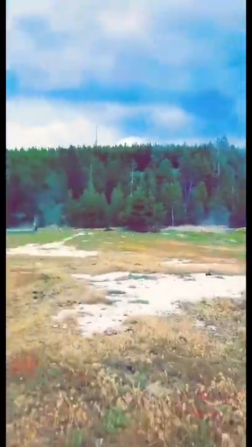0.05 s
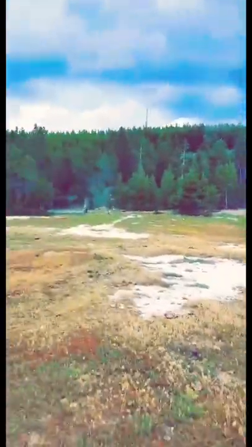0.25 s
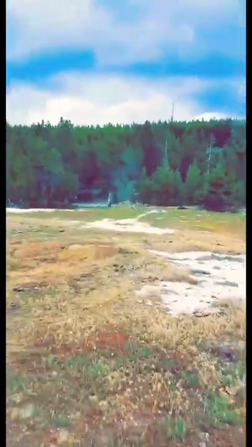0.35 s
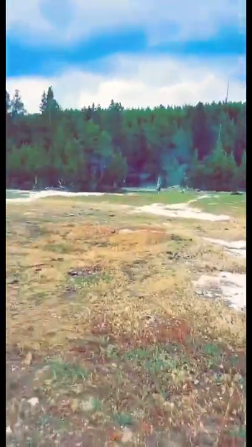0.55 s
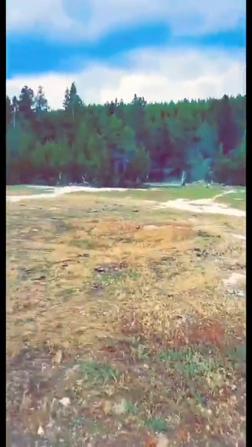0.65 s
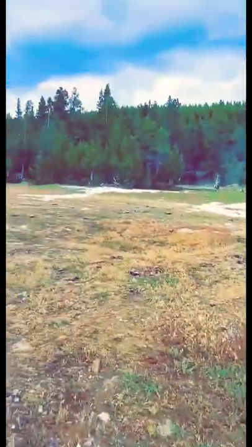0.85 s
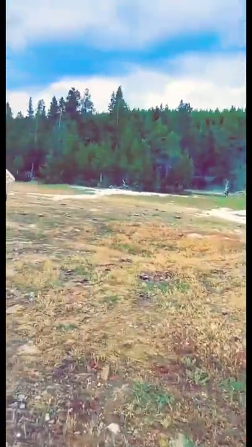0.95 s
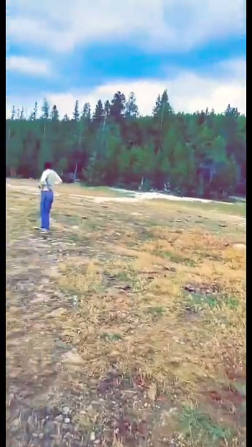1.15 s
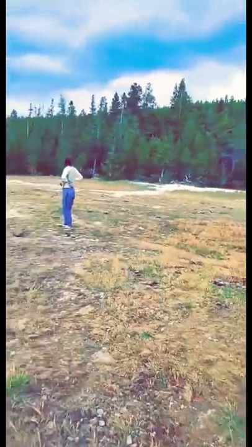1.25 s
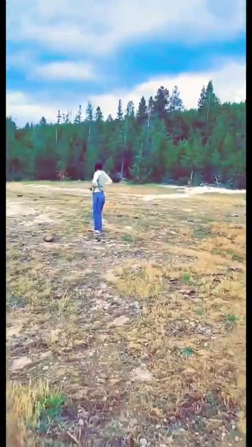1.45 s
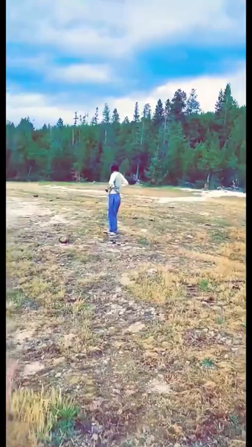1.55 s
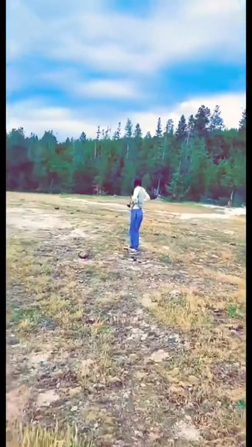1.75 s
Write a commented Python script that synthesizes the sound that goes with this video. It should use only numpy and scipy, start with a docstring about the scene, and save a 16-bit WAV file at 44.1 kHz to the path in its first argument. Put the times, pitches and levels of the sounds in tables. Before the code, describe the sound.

Wind buffets the microphone with a low, uneven rumble over a faint distant rush in an open meadow. Near 0.2 seconds, jacket fabric gives a soft, high swish with a dull rustle. A gust follows at 0.5, then a second swish from 0.6 to 1, with a brief scuff at 0.7. The wind peaks near 1.2. A third swish runs from 1.3 to 1.6, ending in a tiny tick.

```python
"""An open meadow: from the start, turbulent wind buffets the microphone over a faint far rush.
Near 0.2 s a high friction hiss swells and fades, most likely jacket fabric sliding close by,
with a duller rustle of folds. A gust follows, then a second sweep (0.6-1 s) with one short scuff
that knocks the hand-held camera. The wind peaks near 1.2 s, before a third sweep (1.3-1.6 s).
The fabric catches in a few tiny ticks along the way, the last and sharpest just after that sweep."""
import sys
import numpy as np
from scipy import signal
from scipy.fft import rfft, irfft, next_fast_len
from scipy.io import wavfile
from scipy.ndimage import map_coordinates

SR = 44100
rng = np.random.default_rng(int(sys.argv[2]) if len(sys.argv) > 2 else 0)


def materialize(psi):
    """Save the field psi as 16-bit PCM at rate SR to the path in sys.argv[1].

    A 1-D psi becomes a single channel; in a 2-D psi each row is a channel.
    """
    bounded = np.clip(np.atleast_2d(psi).T, -1, 1)
    quanta = np.round(bounded * 32767).astype(np.int16)
    wavfile.write(sys.argv[1], SR, quanta)


N = 79380  # 1.8 s


def swish():
    """Sliding friction: fabric gives a narrow sheen when slow and a broader hiss when brisk."""
    # strength of the sliding: t/s, level/dB
    slide = [(0, -74.5), (.08, -70.5), (.11, -65), (.18, -61), (.24, -54), (.28, -64), (.35, -72),
             (.48, -77.5), (.585, -73), (.615, -62), (.67, -56.5), (.70, -55.5), (.77, -53.5), (.825, -63),
             (.857, -52), (.905, -54), (.945, -51), (.975, -60), (1.02, -66), (1.09, -70.5), (1.13, -65),
             (1.2, -65), (1.25, -67.5), (1.285, -66.5), (1.315, -59.5), (1.44, -59), (1.51, -54.5),
             (1.555, -56), (1.59, -62.5), (1.63, -70.5), (1.8, -72)]
    # spectra of the broad hiss and the narrow sheen: f/Hz, relative level/dB
    broad_spectrum = [(1000, -54), (3000, -28.5), (4000, -23.5), (4900, -30.5), (6200, -21.5),
                      (7600, -29.5), (8600, -17), (10200, -13.5), (11300, -5.5), (12300, -0.5),
                      (13200, -1.5), (14100, -7.5), (15500, -3)]
    sheen_spectrum = [(5000, -33), (9500, -29), (11200, -8.5), (12500, 1), (13300, -8), (14100, -16),
                      (15300, 0)]
    brisk_db = -55
    broad_growth, sheen_growth = 1.184, 0.81  # dB per dB of sliding
    effort_db = curve(slide) - brisk_db + 0.34 * wobble(70)
    broad = amp(2 + broad_growth * effort_db) * friction(broad_spectrum, grain_db=2.5)
    sheen = amp(-5.5 + sheen_growth * effort_db) * friction(sheen_spectrum, grain_db=5.0)
    return amp(brisk_db) * (broad + sheen)


def rustle():
    """Friction and buckling: folds rub dully, some rasp in a narrow band, and a few creases flip."""
    # rubbing of the folds: t/s, relative level/dB
    rubbing = [(0, -96), (.1, -81.5), (.14, -75), (.18, -75.5), (.225, -76), (.3, -81.5), (.45, -104),
               (.6, -88.5), (.68, -77), (.74, -72), (.81, -78), (.845, -76), (.88, -79.5), (.94, -69.5),
               (.995, -72.5), (1.05, -72.5), (1.15, -82.5), (1.28, -84.5), (1.42, -81), (1.55, -75.5),
               (1.6, -88.5), (1.8, -80)]
    # spectrum of the folds: f/Hz, relative level/dB
    spectrum = [(100, -15), (300, 1.5), (550, -5.5), (1000, -8.5), (1550, 2), (1850, -2.5), (2250, -0.5),
                (3000, -20), (4000, -15.5), (4900, -23), (6500, -11), (9000, -25)]
    # creases flipping: t/s, level/dB
    creases = [(.218, -62), (.901, -66), (1.038, -61), (1.5578, -59)]
    # folds rasping: t/s, level/dB, half-length/s, centre f/Hz
    rasping = [(0.23, -71.5, 0.022, 1280), (0.951, -67.5, 0.019, 2100), (1.03, -74, 0.019, 1650),
               (1.103, -76, 0.016, 2330)]
    rub = amp(curve(rubbing) + 1 + 2.2 * wobble(90)) * friction(spectrum, grain_db=2.5)
    flips = sum(amp(db) * burst(t, t60=0.019) for t, db in creases)
    rasps = sum(amp(db) * swell(t, half) * band_noise(hz) for t, db, half, hz in rasping)
    return rub + flips * noise(spectrum) + rasps


def scuff():
    """Stick-slip and impact: a fold drags past and knocks the camera body into a damped vibration."""
    # the passing fold: t/s, relative level/dB, half-length/s
    drags = [(0.708, -44, 0.0024)]
    # spectrum of its slips: f/Hz, relative level/dB
    spectrum = [(100, -14), (220, -14), (330, 10.5), (600, -8), (950, -8), (1500, 2.5), (2300, -1.5),
                (3100, -14.5), (3900, -10.5), (4800, -13.5), (6200, -4), (8000, -11.5), (10300, -7.5),
                (12200, 8), (14000, -12.5), (15500, 2)]
    body_hz = 325
    slips = sum(amp(db) * swell(t, half) for t, db, half in drags)
    knock = sum(amp(db - 12) * burst(t - half, t60=0.033) for t, db, half in drags)
    return slips * friction(spectrum, grain_db=3) + knock * np.sin(2 * np.pi * body_hz * clock())


def ticks():
    """Impulsive excitation: each tiny catch of the fabric releases a bright, decaying noise."""
    # catches: t/s, level/dB, T60/s
    catches = [(0.372, -66.5, 0.079), (0.533, -66, 0.023), (1.217, -58.5, 0.052), (1.2653, -55.5, 0.034),
               (1.644, -48, 0.0037)]
    # spectrum of a catch: f/Hz, relative level/dB
    spectrum = [(1000, -28), (5000, -20), (9000, -15.5), (12500, 11.5), (15500, -1.5)]
    return sum(amp(db) * burst(t, t60) for t, db, t60 in catches) * noise(spectrum)


def wind():
    """Turbulent pressure: eddies of fairly even size thump the microphone as hard as the gust blows."""
    # gust strength: t/s, relative level/dB
    gusts = [(0, -69), (.08, -72), (.135, -62), (.23, -56.5), (.28, -67.5), (.31, -54.5), (.35, -62.5),
             (.378, -50), (.4, -60.5), (.475, -52), (.497, -42.5), (.53, -41), (.615, -53), (.637, -43.5),
             (.665, -59), (.71, -53), (.85, -56.5), (.94, -47.5), (.99, -51), (1.01, -42.5), (1.1, -45),
             (1.19, -38.5), (1.24, -46), (1.365, -65), (1.395, -48.5), (1.435, -51.5), (1.48, -58),
             (1.6, -59), (1.635, -57.5), (1.8, -58)]
    # spectrum of the buffeting: f/Hz, relative level/dB
    spectrum = [(15, -22.5), (30, -7), (50, 4.5), (68, 0.5), (90, -7), (130, -19), (170, -28), (250, -35.5),
                (500, -58), (1500, -93)]
    smoothing_s = .035  # time over which the thumps even out
    eddies = noise(spectrum)
    window = signal.windows.hann(int(2 * smoothing_s * SR))
    local_rms = np.sqrt(np.abs(signal.fftconvolve(eddies ** 2, window / window.sum(), "same")))
    return amp(curve(gusts) - 0.5) * unit(eddies / local_rms)


def far_rush():
    """Ambient noise: the meadow's faint broadband rush wavers slightly in level."""
    # spectrum of the rush: f/Hz, relative level/dB
    spectrum = [(30, 0), (150, 5.5), (300, -2), (500, -2.5), (800, -3), (1300, -7), (2000, -13.5),
                (3000, -16), (4200, -16), (6000, -20), (8000, -29), (15000, -19.5)]
    return amp(-74.5 + 0.55 * wobble(11)) * noise(spectrum)


def friction(spectrum, grain_db, grains_per_s=900):
    """Stick-slip: catching threads break the noise into tiny slips of random strength."""
    slips = rng.standard_normal(N) * amp(grain_db * wobble(grains_per_s))
    return coloured(slips, spectrum)


def noise(spectrum):
    """Gaussian noise with a given spectrum."""
    return coloured(rng.standard_normal(N), spectrum)


def band_noise(centre_hz, width_hz=490):
    """Resonance: noise gathered around one frequency."""
    white = rng.standard_normal(N)
    return unit(filtered(white, lambda hz: 1 / (1 + ((hz - centre_hz) / width_hz) ** 2) ** 2))


def burst(start, t60, attack_s=.0002):
    """Damping: a quick rise, then exponential decay by 60 dB in t60 seconds."""
    t = np.maximum(clock() - start, 0)
    return (1 - np.exp(-t / attack_s)) * amp(-60 * t / t60)


def swell(middle, half):
    """Gaussian envelope with standard deviation half, in seconds."""
    return np.exp(-.5 * ((clock() - middle) / half) ** 2)


def coloured(x, spectrum):
    """Spectral shaping by (f/Hz, relative level/dB) points, at rms 1."""
    f, db = np.transpose(spectrum)
    return unit(filtered(x, lambda hz: amp(np.interp(np.log(hz + 1), np.log(f), db))))


def filtered(x, response):
    """Linear filtering: the spectrum of x times a frequency response."""
    size = next_fast_len(N + 8192)
    return irfft(rfft(x, size) * response(np.fft.rfftfreq(size, 1 / SR)), size)[:N]


def wobble(rate):
    """Smooth random modulation, rate knots a second."""
    knots = rng.standard_normal(int(N * rate / SR) + 4)
    return map_coordinates(knots, [clock() * rate])


def curve(rows):
    """Linear interpolation of (t/s, value) points."""
    return np.interp(clock(), *np.transpose(rows))


def clock():
    """Sample times in seconds."""
    return np.arange(N) / SR


def amp(db):
    """Decibels to amplitude ratio."""
    return 10 ** (np.asarray(db) / 20)


def unit(x):
    """Normalisation to rms 1."""
    return x / np.sqrt(np.mean(x ** 2) + 1e-20)


def scene():
    """Superposition: near fabric, wind and the far rush add in one channel."""
    return (swish() + rustle() + scuff() + ticks() + wind() + far_rush())[None]


def record(dry):
    """Band limiting: the camera passes nothing above its cutoff."""
    cutoff_hz = 15850
    return np.array([filtered(channel, lambda hz: hz < cutoff_hz) for channel in dry])


dry = scene()
out = record(dry)
materialize(out)
```